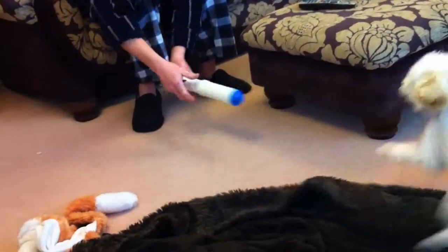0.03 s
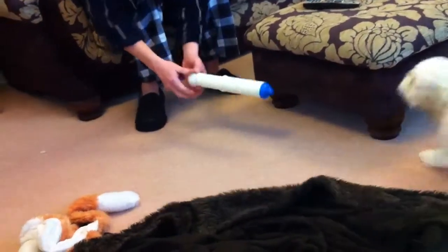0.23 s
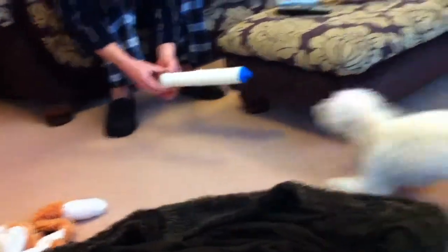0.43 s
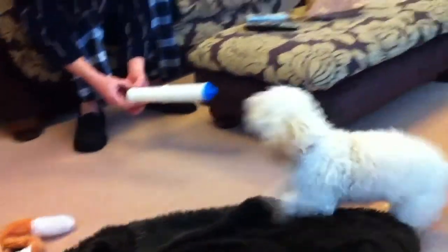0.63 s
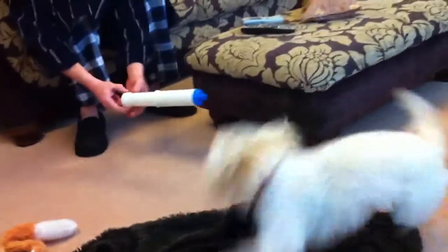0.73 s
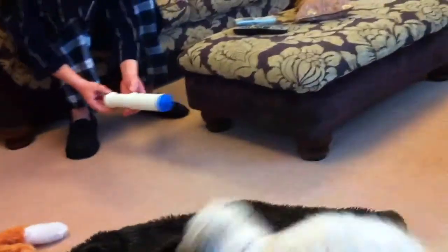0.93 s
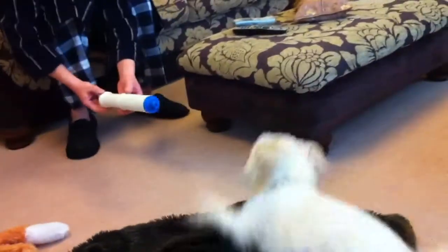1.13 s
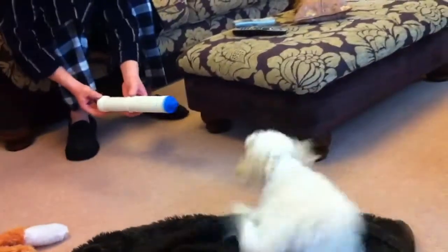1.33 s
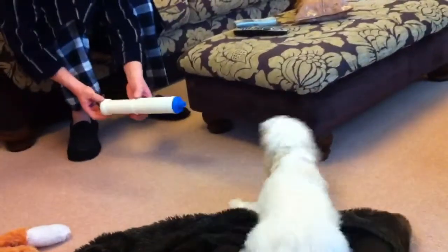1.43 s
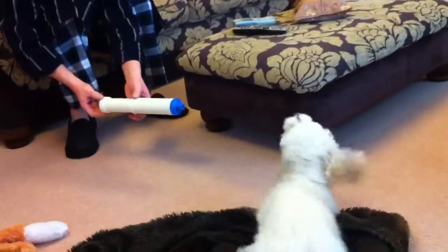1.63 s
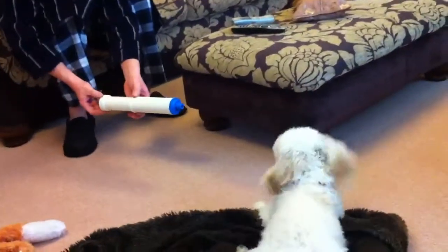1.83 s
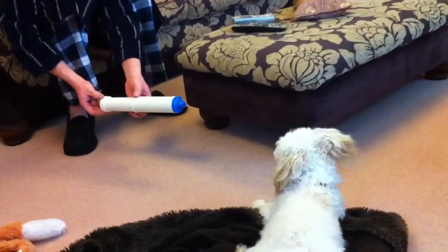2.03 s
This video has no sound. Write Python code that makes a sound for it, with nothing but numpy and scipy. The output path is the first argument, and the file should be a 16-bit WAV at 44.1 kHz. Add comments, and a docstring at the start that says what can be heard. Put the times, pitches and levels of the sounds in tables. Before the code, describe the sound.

A small dog barks close by in a carpeted living room: three quick hoarse barks, a brief pause, then two more. Its paws thump and scuff softly on the carpet over a faint steady background noise.

```python
"""A small dog barks five times, three barks and then two, in a carpeted living room.
Its vocal folds drive the resonances of throat and mouth: each bark swoops up from a low growl
to a hoarse yelp and falls back, and the first of each bout is the harshest.
Its paws thump and scuff softly on the carpet, and the room rings briefly over a faint steady noise."""
import sys
import numpy as np
from scipy import signal
from scipy.fft import rfft, irfft, next_fast_len
from scipy.io import wavfile
from scipy.ndimage import uniform_filter1d, minimum_filter1d, map_coordinates

SR = 44100
rng = np.random.default_rng(int(sys.argv[2]) if len(sys.argv) > 2 else 0)


def file_out(sig):
    """Save sig as 16-bit WAV at sys.argv[1]."""
    # one column per channel
    cols = np.atleast_2d(sig).T
    # limit, then scale
    lim = np.clip(cols, -1, 1)
    pcm = np.round(lim * 32767).astype(np.int16)
    wavfile.write(sys.argv[1], SR, pcm)


N = 92610


def amp(db):
    """Amplitude ratio: tenfold for every 20 dB."""
    return 10 ** (np.asarray(db) / 20)


def unit(x):
    """Normalisation to an rms of 1."""
    return x / np.sqrt(np.mean(x ** 2) + 1e-20)


def along(points, hz):
    """Interpolation of (frequency_hz, value) points on a logarithmic frequency axis."""
    frequencies, values = np.transpose(points)
    return np.interp(np.log(hz + 1), np.log(frequencies + 1), values)


def wobble(knots_per_s):
    """Random modulation: a smooth curve through Gaussian knots."""
    return map_coordinates(rng.standard_normal(4096), [np.arange(N) * knots_per_s / SR], mode='wrap')


def filtered(x, response):
    """Linear filtering: the spectrum is multiplied by a frequency response."""
    size = next_fast_len(N + SR // 2)
    return irfft(rfft(x, size) * response(np.fft.rfftfreq(size, 1 / SR)), size)[:N]


def noise(spectrum):
    """Spectral shaping turns white noise into coloured noise of rms 1."""
    return unit(filtered(rng.standard_normal(N), lambda hz: amp(along(spectrum, hz))))


def room_air():
    """Ambient noise: faint, stationary and strongest in the bass."""
    # background spectrum: frequency_hz, level_db
    spectrum = [(25, -16.5), (60, -16), (130, 1), (250, 2), (500, -12.5), (1200, -5), (3000, -12),
                (8000, -14.5), (15500, -14.5)]
    return amp(-65.5) * noise(spectrum)


def in_room(x):
    """Reverberation: a diffuse tail follows the direct sound, each band decaying exponentially."""
    # reverberation times: frequency_hz, t60_s
    decay_times = [(100, 0.14), (300, 0.28), (520, .33), (760, 0.29), (950, 0.28), (1150, 0.3),
                   (1450, 0.28), (1850, 0.35), (2170, 0.32), (2800, 0.25), (8000, 0.25), (15000, 0.18)]
    direct_db, tail_db, delay_s = 0.5, -4, 0.0043
    hz, t, bands = signal.stft(rng.standard_normal(SR * 3 // 4), SR, nperseg=256)
    decay = amp(-60 * t / along(decay_times, hz)[:, None])
    tail = signal.istft(bands * decay, SR, nperseg=256)[1]
    tail *= np.clip(np.arange(len(tail)) / SR / delay_s - 1, 0, 1)
    mid_power = np.mean(np.abs(rfft(tail, SR)[500:2000]) ** 2)  # 500 to 2000 Hz
    return amp(direct_db) * x + amp(tail_db) * signal.fftconvolve(x, tail / np.sqrt(mid_power))[:N]


def paws():
    """Impact and friction: each paw excites damped floor modes and scuffs the carpet."""
    # paws landing or sliding: start_s, thump_db, scuff_db, rise_s, t60_s
    landings = [(.005, -70, -55.5, 0.0035, 0.23), (0.138, -63, -46.5, 0.038, .5),
                (0.431, -42, -56, .008, 0.37), (0.666, -41, -62, 0.0044, 0.13),
                (1.019, -58, -52, 0.018, 0.15), (1.179, -45, -45.5, 0.0065, 0.12),
                (1.372, -33, -57.5, 0.0035, 0.1)]
    # floor resonances: frequency_hz, level_db
    floor_modes = [(135, -3.5), (178, -0.5), (245, -1), (320, -13)]
    # carpet friction spectrum: frequency_hz, level_db
    scuff = [(100, -2), (250, -10.5), (600, -8), (1300, -7), (2500, -17), (5000, -22), (15000, -30.5)]
    out = np.zeros(N)
    for start_s, thump_db, scuff_db, rise_s, t60_s in landings:
        t = np.maximum(np.arange(N) / SR - start_s, 0)
        thump = unit(sum(amp(db) * np.sin(2 * np.pi * (hz * t + rng.random())) for hz, db in floor_modes))
        envelope = (1 - np.exp(-(t / rise_s) ** 2)) * amp(-60 * t / t60_s)
        out += envelope * (amp(thump_db) * thump + amp(scuff_db) * noise(scuff))
    return out


def teeth_hiss(level_db, pulses):
    """Turbulence: pulsed air hisses past the teeth, following the vocal effort with a first-order lag."""
    # hiss spectrum: frequency_hz, level_db
    spectrum = [(3000, -9), (4500, -32.5), (6100, -14), (6900, -14), (7600, -0.5), (8200, 2), (9000, -5.5),
                (9700, -12), (10300, -6.5), (12000, -11.5), (14500, -13.5), (15700, -28.5)]
    lag_s, db_per_db, reference_db = 0.011, 1.17, -12
    pole = np.exp(-1 / (lag_s * SR))
    airflow = signal.lfilter([1 - pole], [1, -pole], amp(db_per_db * (level_db - reference_db)))
    return airflow * unit(pulses * noise(spectrum))


def snarl(pulses, centre_s, resonance_hz):
    """Cavity resonance: a burst of pulsed noise rings behind bared teeth, tuned by the lips."""
    # bared-teeth resonance before the lips shift it: frequency_hz, level_db
    spectrum = [(900, -38.5), (1350, -8), (1600, 6), (1800, -5.5), (2200, -36.5), (3100, -30), (4500, -49),
                (12000, -63.5)]
    unshifted_hz, half_width_s = 1610, 0.029
    shifted = [(hz * resonance_hz / unshifted_hz, db) for hz, db in spectrum]
    envelope = np.exp(-((np.arange(N) / SR - centre_s) / half_width_s) ** 2)
    return envelope * unit(pulses * noise(shifted))


def growl(phase, pitch_hz, level_db, roughness):
    """Low-pass filtering: a nearly shut mouth passes the lowest harmonics and some muffled noise."""
    # response of the nearly shut mouth: frequency_hz, gain_db
    shut = [(120, -16), (200, -1.5), (270, 4.5), (340, -3.5), (410, -8.5), (500, -7.5), (620, -4.5),
            (760, -7), (950, -33.5), (2000, -51)]
    share, ceiling_db = 0.68, -40
    hum = np.sqrt(2) * sum(amp(along(shut, k * pitch_hz)) * np.sin(k * phase) for k in range(1, 5))
    gain = np.minimum(share * amp(level_db), amp(ceiling_db))
    return gain * (hum + 0.6 * roughness * noise(shut))


def vocal_tract(opening, bright_db, jaw_hz, jaw_db):
    """Formants: the resonances of throat and mouth, as a gain in dB against frequency."""
    # responses with the mouth wide and narrow: frequency_hz, gain_db
    wide = [(120, -37.5), (240, -25), (400, -20.5), (480, -24.5), (600, -20.5), (810, 14), (1000, -0.5),
            (1270, -5), (1450, -12), (1900, -20), (2430, -17), (2750, -22), (3100, -23), (3800, -35.5),
            (4700, -36), (6700, -43), (16000, -83.5)]
    narrow = [(120, -43), (240, -29.5), (410, -24), (560, -8.5), (640, -7), (770, 6), (950, -7.5),
              (1150, 3), (1400, -9.5), (1900, -19.5), (2120, -10.5), (2330, -15), (2650, -28),
              (3500, -39.5), (5000, -51), (6500, -68), (16000, -88)]
    jaw_width_hz = 130
    return lambda hz: (opening * along(wide, hz) + (1 - opening) * along(narrow, hz)
                       + along([(1200, 0), (1670, bright_db)], hz)
                       + jaw_db * np.exp(-((hz - jaw_hz) / jaw_width_hz) ** 2))


def clear_tone(phase, pitch_hz, tract_db):
    """Source and filter: twenty harmonics of the vocal folds slide through the formants at rms 1."""
    # colour of the periodic source: frequency_hz, level_db
    colour = [(250, -5), (390, -4), (520, -1.5), (1200, 2), (1700, -1.5), (2300, 1), (3000, -7.5),
              (4500, -8.5)]
    k = np.arange(1, 21)[:, None]
    gains = amp(tract_db(k * pitch_hz) + along(colour, k * pitch_hz))
    return (gains * np.sin(k * phase)).sum(0) / np.sqrt((gains ** 2).sum(0) / 2)


def hoarse_noise(pulses, tract_db):
    """Amplitude modulation: the vocal folds chop breath noise, which the formants then shape."""
    # colour of the noise source: frequency_hz, level_db
    colour = [(60, -25), (150, -10.5), (400, 0.5), (800, -2.5), (1500, 4.5), (2300, 8), (3000, 6),
              (6000, 0.5)]
    breath = pulses * rng.standard_normal(N)
    return unit(filtered(breath, lambda hz: amp(tract_db(hz) + along(colour, hz))))


def harden(voice, level_db):
    """Spectral tilt follows effort: a harder push brightens the voice."""
    corner_hz, extra_db_per_db, reference_db = 890, 0.18, -8.5
    treble = filtered(voice, lambda hz: 1 - 1 / (1 + (hz / corner_hz) ** 10))
    return voice + treble * (amp(extra_db_per_db * (level_db - reference_db)) - 1)


def bark(contour, opening, bright_db, jaw_hz, jaw_db, hiss_db, snarl_s, snarl_db, snarl_hz):
    """Phonation: the vocal folds swoop in pitch, and roughness trades their tone for pulsing noise."""
    fade_s, pulse_depth, shimmer_db, mouth_opens_db = .005, 0.52, 0.5, -39
    t = np.arange(N) / SR
    times_s, *columns = np.transpose(contour)
    pitch_hz, level_db, roughness = [np.interp(t, times_s, column) for column in columns]
    gate = np.clip(np.minimum(t - times_s[0], times_s[-1] - t) / fade_s + .5, 0, 1)
    sounding = gate > 0
    jitter = (.006 + 0.052 * roughness) * wobble(knots_per_s=330)
    phase = 2 * np.pi * np.cumsum(pitch_hz * (1 + jitter)) / SR
    pulses = 1 + pulse_depth * np.cos(phase)
    tract_db = vocal_tract(opening, bright_db, jaw_hz, jaw_db)
    tone = np.zeros(N)
    tone[sounding] = clear_tone(phase[sounding], pitch_hz[sounding], tract_db)
    voice = np.sqrt(1 - roughness ** 2) * tone + roughness * hoarse_noise(pulses, tract_db)
    mouth_open = 1 / (1 + amp(mouth_opens_db - level_db) ** 2)  # soft parts leave mostly the growl
    yelp = harden(mouth_open * amp(level_db) * voice, level_db)
    rasp = amp(snarl_db) * snarl(pulses, snarl_s, snarl_hz)
    hiss = amp(hiss_db) * teeth_hiss(level_db, pulses)
    low = growl(phase, pitch_hz, level_db, roughness)
    shimmer = amp(shimmer_db * roughness * wobble(knots_per_s=110))
    return gate * shimmer * (yelp + low + rasp + hiss)


def scene():
    """Superposition of dog, paws and air; each bark rings briefly with its own random echo tail."""
    # vocal fold contours, one list a bark: time_s, pitch_hz, level_db, roughness (0 to 1)
    contours = [
        [(.114, 245, -55, 0.1), (.145, 226.8, -57, 0.54), (.185, 200.4, -49, 0.76), (.222, 196.2, -48, 0.58),
         (.234, 322.6, -26.5, .7), (.247, 426, -17, 0.4), (.272, 565, -17.5, 0.94), (.305, 645.3, -13, 0.48),
         (.345, 629.5, -16, 0.68), (.368, 336.8, -28, 0.5), (.395, 240, -41.5, 0.8), (.42, 238, -44.5, .6)],
        [(.422, 237.3, -34.5, .5), (.44, 278, -31, 0.3), (.46, 368.6, -22, 0.86), (.483, 502, -19.5, 0.83),
         (.512, 569.4, -12, 0.3), (.548, 585.6, -10, .15), (.556, 571, -25.5, 0.37), (.56, 371.8, -18, .25),
         (.568, 359.8, -13, 0.42), (.598, 283.2, -37.5, .5), (.64, 231.3, -35.5, .2)],
        [(.645, 230.6, -42, 0), (.678, 264.8, -33.5, 0), (.688, 350.2, -26.5, 0.4), (.7, 453, -22.5, 0.4),
         (.744, 535.8, -14.5, 0.23), (.759, 561.2, -10.5, 0.22), (.769, 564, -13.5, 0.3),
         (.773, 393.5, -14.5, 0.3), (.796, 382.2, -20.5, 0.3), (.813, 371.7, -16.5, 0.3), (.835, 277, -59, .6),
         (.88, 258, -55, .6)],
        [(1.411, 448.3, -39.5, .3), (1.416, 464.9, -18, 0.37), (1.426, 477, -18, 0.58), (1.438, 491.8, -17, 1),
         (1.452, 604.8, -9.5, .8), (1.472, 643.7, -8.5, 0.9), (1.484, 400.8, -13, 0.2), (1.505, 401, -14, .35),
         (1.518, 380.5, -23.5, 0.2), (1.548, 340.4, -34, 0.22), (1.575, 264, -42, 0.3), (1.61, 247, -36.5, 0.4)],
        [(1.612, 230, -40, 0.4), (1.655, 259.2, -31.5, 0.5), (1.676, 357.6, -23.5, 0), (1.688, 475, -24, 0.4),
         (1.712, 547.8, -16, 0.1), (1.738, 581.4, -20, 0.27), (1.75, 580.2, -7, 0.94),
         (1.767, 565.3, -14.5, .7), (1.778, 571, -18.5, 0.61), (1.812, 353.7, -25, 0.5),
         (1.845, 288.4, -45, 0.1), (1.9, 288, -54.5, 0.3)],
    ]
    # the mouth in each bark: opening (0 to 1), bright_db, jaw_hz, jaw_db,
    # hiss_db, snarl_s, snarl_db, snarl_hz
    mouths = [(0.81, 5, 950, -1.5, -36.5, 0.2714, -23.5, 1620), (0.02, 3, 700, -1, -40, .468, -27.5, 1440),
              (0.07, -0.5, 660, 5, -41, .71, -32.5, 1790), (0.94, 0.5, 500, -1, -42.5, 1.44, -27, 1610),
              (0.04, -7, 877, 10, -43.5, 1.2, -38, 1250)]
    dog = sum(in_room(bark(contour, *mouth)) for contour, mouth in zip(contours, mouths))
    return (dog + in_room(paws()) + room_air())[None]


def record(dry):
    """Band and peak limiting: the microphone sheds deep bass, a limiter holds peaks, the top is cut."""
    low_hz, top_hz = 90.8, 15750
    peak_limit, hold_s = 0.69, .006
    x = signal.sosfilt(signal.butter(2, low_hz, 'high', fs=SR, output='sos'), dry[0])
    hold = int(hold_s * SR)
    needed_gain = peak_limit / np.maximum(np.abs(x), peak_limit)
    gain = uniform_filter1d(minimum_filter1d(needed_gain, hold), hold)
    return filtered(gain * x, lambda hz: hz < top_hz)[None]


dry = scene()
out = record(dry)
file_out(out)
```